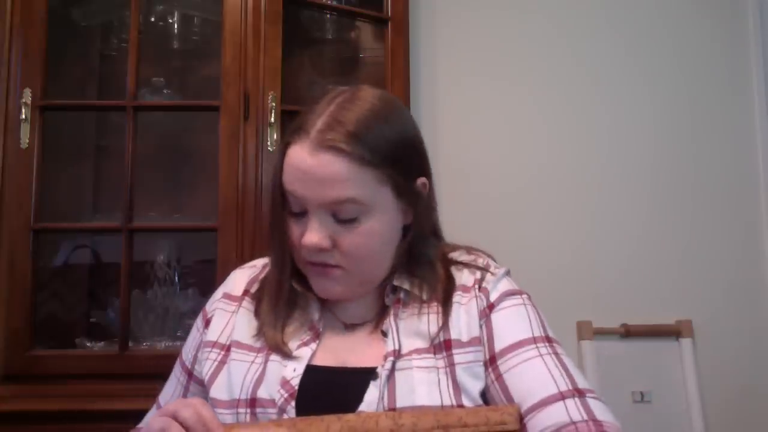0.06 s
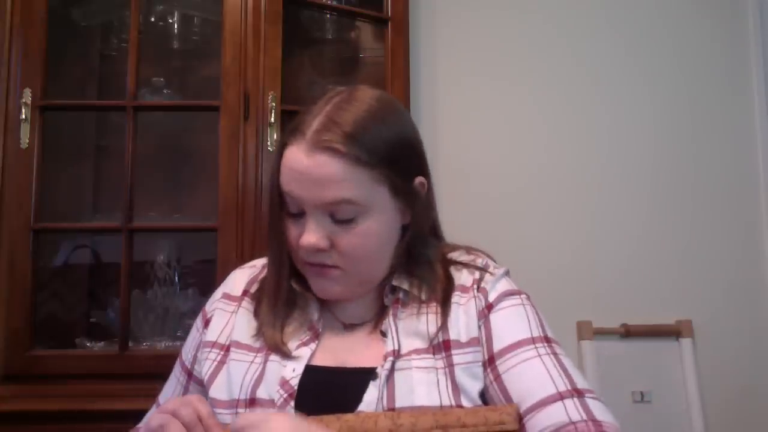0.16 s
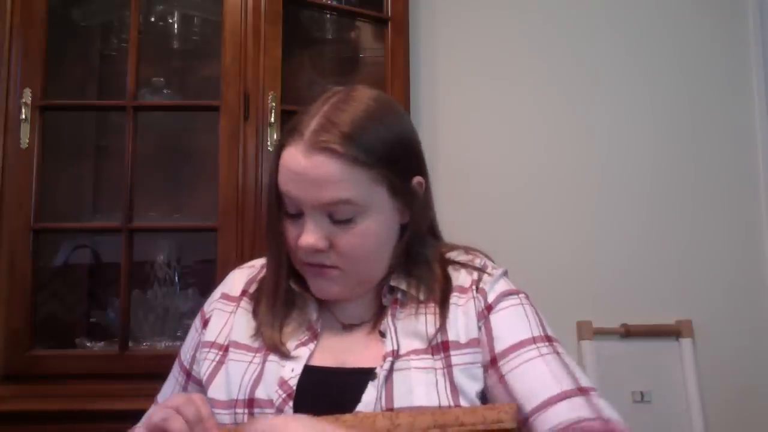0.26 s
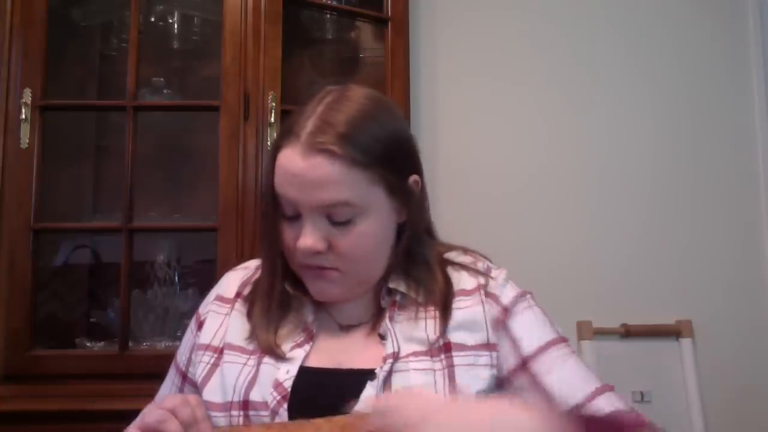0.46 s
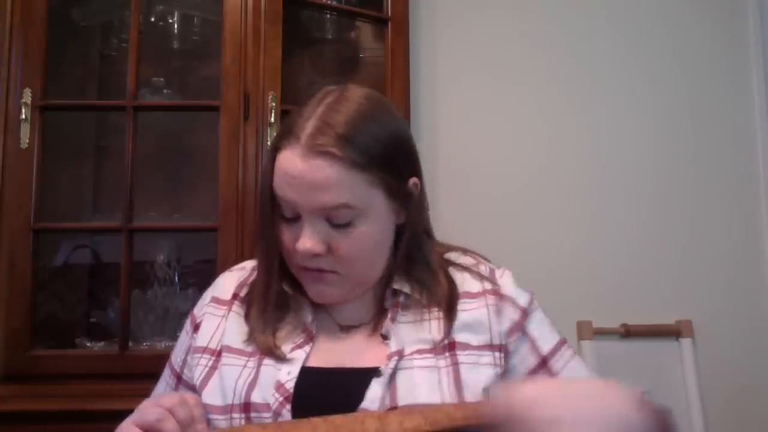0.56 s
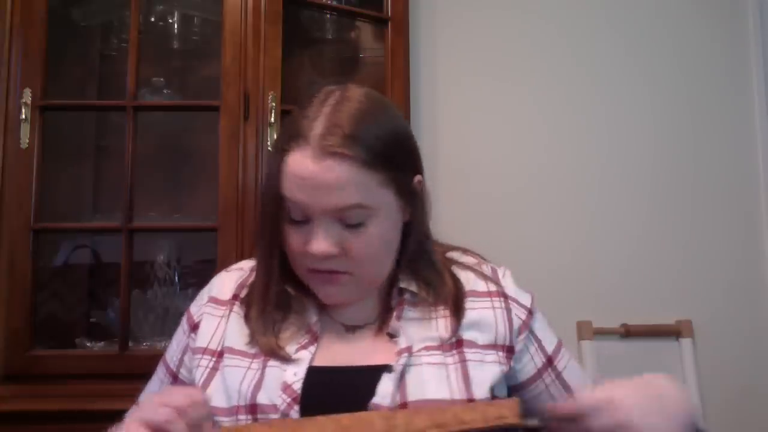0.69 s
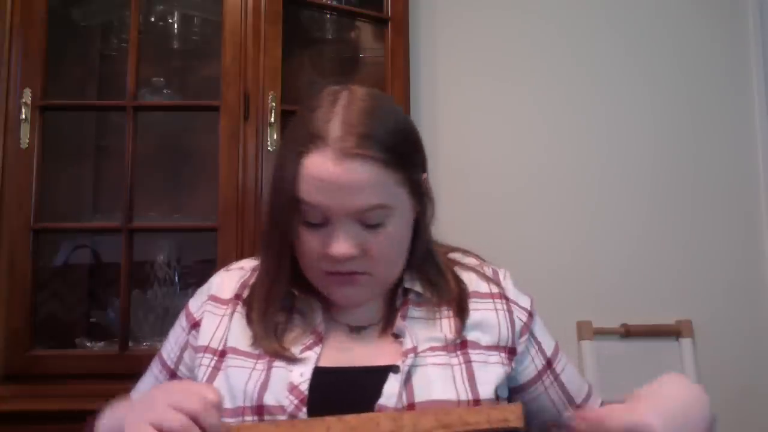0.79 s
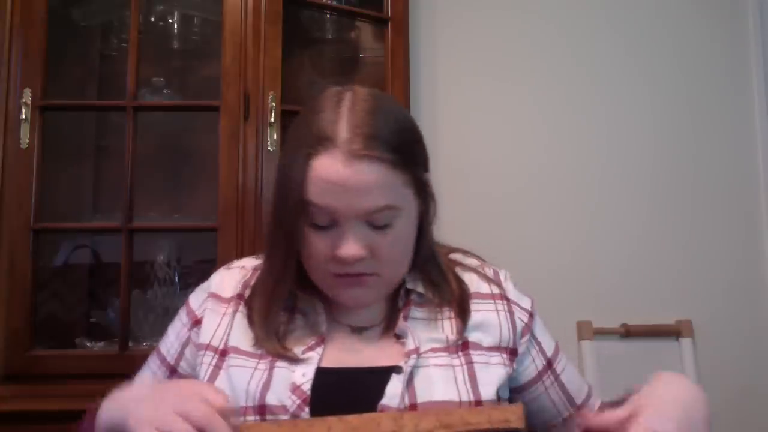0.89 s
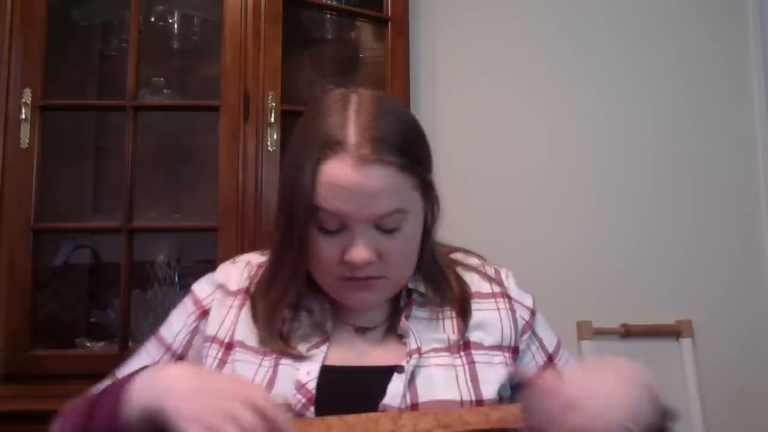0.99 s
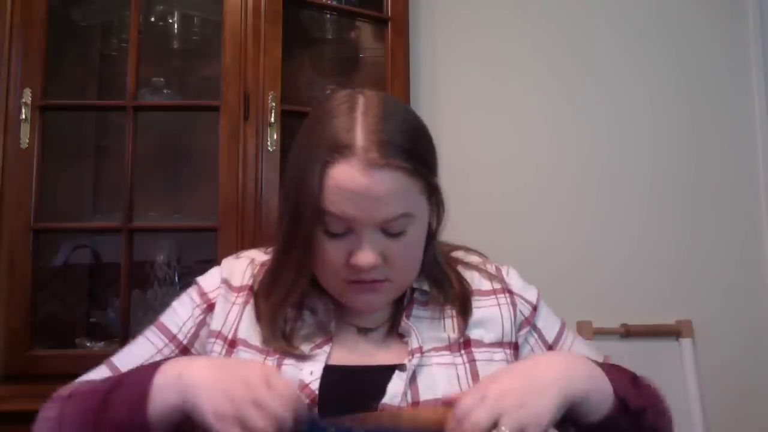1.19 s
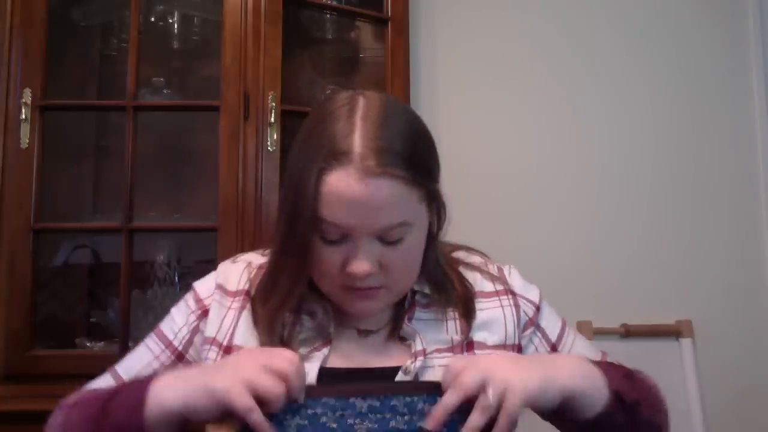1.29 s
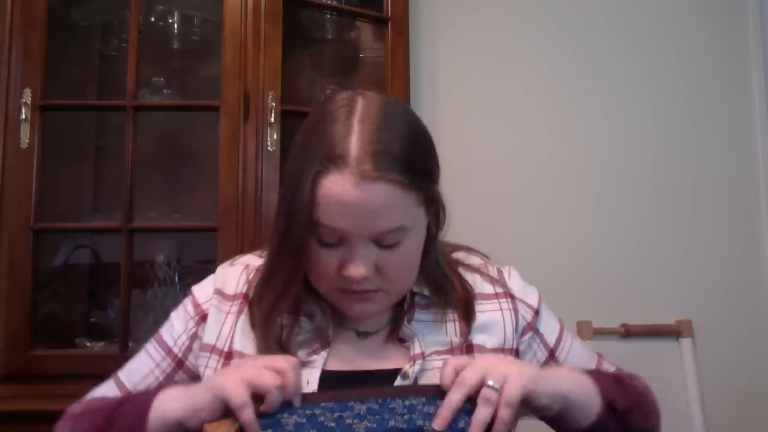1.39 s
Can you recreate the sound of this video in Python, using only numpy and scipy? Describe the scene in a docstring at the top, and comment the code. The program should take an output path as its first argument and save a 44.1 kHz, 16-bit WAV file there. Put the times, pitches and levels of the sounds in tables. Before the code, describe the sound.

A zipper on a fabric bag is pulled open in a quiet small room. The tab ticks lightly just before 0.2 seconds, then the zip runs until about 0.7 seconds, its rasp rising in pitch to around 0.5 seconds and falling again, with thin metal squeaks. Soft thuds, faint cloth rustle and more small ticks follow until about 1.3 seconds, over a faint hum.

```python
"""A small room hums and the cloth of a fabric bag rustles faintly. The pull tab ticks, then the
zipper opens in one short stroke. The slider trips over the teeth at a rate that rises and falls
with the hand's speed; each tooth thumps the tape and scrapes the slider. Metal parts squeak and
the room briefly echoes the zipper's low tone. Soft thuds follow, and the tab ticks again."""
import sys
import numpy as np
from scipy import signal
from scipy.fft import rfft, irfft, next_fast_len
from scipy.io import wavfile
from scipy.ndimage import uniform_filter1d, map_coordinates

SR = 44100
rng = np.random.default_rng(int(sys.argv[2]) if len(sys.argv) > 2 else 0)


def waveform_to_disk(signal):
    """Save audio, clipped to [-1, 1], as 16-bit WAV at the path in sys.argv[1]."""
    frames = np.transpose(np.atleast_2d(signal))
    scaled = np.clip(frames, -1, 1) * 32767
    samples = np.round(scaled).astype(np.int16)
    wavfile.write(sys.argv[1], SR, samples)


N = 63945
TIME_S = np.arange(N) / SR


def amp(db):
    return 10 ** (np.asarray(db) / 20)


def unit_rms(x):
    return x / np.sqrt(np.mean(x ** 2) + 1e-20)


def at_hz(points, hz):
    """Read (hz, value) points on a log axis."""
    knots_hz, values = np.transpose(points)
    return np.interp(np.log(hz + 1), np.log(knots_hz + 1), values)


def curve(points):
    """Read (time_s, value) points at every sample."""
    return np.interp(TIME_S, *np.transpose(points))


def wobble(knots_per_s):
    """Smooth random curve."""
    return map_coordinates(rng.standard_normal(N // 20), [TIME_S * knots_per_s])


def filtered(x, response):
    """Apply a gain given as a function of Hz."""
    size = next_fast_len(N + SR // 2)
    return irfft(rfft(x, size) * response(np.fft.rfftfreq(size, 1 / SR)), size)[:N]


def coloured(x, spectrum, size=4096):
    """Minimum-phase, unit-energy filter shaped by (hz, db) points."""
    cepstrum = irfft(np.log(amp(at_hz(spectrum, np.fft.rfftfreq(size, 1 / SR)))))
    cepstrum[1:size // 2] *= 2
    cepstrum[size // 2 + 1:] = 0
    ring = irfft(np.exp(rfft(cepstrum)))
    return signal.fftconvolve(x, ring / np.linalg.norm(ring))[:N]


def pulses(positions, sizes, half_width=8):
    """Impulses at fractional sample positions."""
    taps = np.floor(positions)[:, None].astype(int) + np.arange(1 - half_width, half_width + 1)
    offset = taps - positions[:, None]
    weights = sizes[:, None] * np.sinc(offset) * np.sinc(offset / half_width)
    return np.bincount(np.clip(taps, 0, N).ravel(), weights.ravel(), N + 1)[:N]


def swells(rows, half_width_hz):
    """Half-sine swells of narrow-band noise."""
    out = np.zeros(N)
    for start_s, db, pitch_hz, length_s in rows:
        band = filtered(rng.standard_normal(N),
                        lambda hz: 1 / (1 + ((hz - pitch_hz) / half_width_hz) ** 4))
        progress = np.clip((TIME_S - start_s) / length_s, 0, 1)
        out += amp(db) * np.sin(np.pi * progress) * unit_rms(band)
    return out


# air noise spectrum: freq_hz, gain_db
AIR_SPECTRUM = [(15, -68), (25, -13), (43, -31), (82, -14.5), (156, -6), (289, -9), (444, -18), (482, -21),
                (1080, -22.5), (1900, -21.5), (2920, -29), (3250, -20.5), (3530, -30), (5420, -31.5),
                (15500, -49.5)]
# mains hum: pitch_hz, level_db
MAINS_HUM = [(59.5, -83.5), (119, -72.5)]


def room_tone(air_db=-64):
    """Steady air noise and faint mains hum."""
    hum = sum(amp(db) * np.sqrt(2) * np.sin(2 * np.pi * (hz * TIME_S + rng.random()))
              for hz, db in MAINS_HUM)
    return hum + amp(air_db) * coloured(rng.standard_normal(N), AIR_SPECTRUM)


# cloth handling: time_s, level_db
RUSTLE_LEVEL = [(0, -66.5), (.14, -78), (.3, -47.5), (.72, -63.5), (.86, -67), (.96, -67.5), (1.04, -70.5),
                (1.10, -67.5), (1.135, -64), (1.17, -69), (1.21, -62.5), (1.28, -66.5), (1.45, -74.5)]
# cloth spectrum: freq_hz, gain_db
CLOTH_SPECTRUM = [(200, -5.5), (700, 3), (1500, 1), (2400, -1.5), (4000, -2.5), (7000, -10), (10000, -24),
                  (15000, -39)]


def cloth(grain_db=3):
    """Grainy rustle of the bag in the hands."""
    flutter = unit_rms(uniform_filter1d(rng.standard_normal(N), size=80))
    grain = unit_rms(amp(grain_db * flutter))
    return amp(curve(RUSTLE_LEVEL)) * coloured(grain * rng.standard_normal(N), CLOTH_SPECTRUM)


# pull tab ticks: start_s, level_db, ring_hz
TAB_TICKS = [(0.1496, -54, 2880), (0.174, -55.5, 3000), (0.2007, -53, 2960), (0.774, -55.5, 5310),
             (.857, -54, 1380), (0.9163, -48.5, 3800), (.919, -55.5, 7560), (.973, -56.5, 3040),
             (0.991, -57, 1240), (1.061, -57, 7340), (1.143, -56.5, 6500)]


def pull_tab(t60_s=0.022, width_oct=0.22, crack_db=-4.5):
    """The loose tab ticks: a broad crack with one brief resonance."""
    out = np.zeros(N)
    hz = np.geomspace(200, 16000, num=60)
    crack = amp(crack_db + at_hz(CLOTH_SPECTRUM, hz))
    for start_s, db, ring_hz in TAB_TICKS:
        decay = (TIME_S >= start_s) * amp(db - 60 * np.abs(TIME_S - start_s) / t60_s)
        resonance = np.exp(-.5 * (np.log2(hz / ring_hz) / width_oct) ** 2)
        spectrum = np.column_stack([hz, 20 * np.log10(resonance + crack)])
        out += coloured(decay * rng.standard_normal(N), spectrum)
    return out


# tape and bag resonances: centre_hz, width_hz, gain_db
BAG_MODES = [(313, 100, -7.5), (620, 230, -21), (1220, 230, 4), (1530, 160, -3.5), (2640, 580, -5),
             (3880, 1170, -4.5), (4990, 620, -11)]


def tooth_thumps(strikes, low_hz=202, top_hz=6500, waver_db=3):
    """Teeth ring tape and bag; the small bag radiates little bass, the soft tape little treble."""
    def response(hz):
        modes = sum((-1) ** k * amp(db) * 1j * hz * width / (centre ** 2 - hz ** 2 + 1j * hz * width)
                    for k, (centre, width, db) in enumerate(BAG_MODES))
        return modes * hz / (hz - 1j * low_hz) / (1 + (hz / top_hz) ** 6)

    waver = amp(waver_db * np.tanh(wobble(knots_per_s=77)))
    return unit_rms(filtered(strikes, response) * waver)


def friction(contact):
    """Noise of even strength, gated by the contact."""
    noise = rng.standard_normal(N)
    return contact * noise / np.sqrt(np.abs(uniform_filter1d(noise ** 2, size=20)))


# slider scraping on teeth: freq_hz, gain_db
SCRAPE_SPECTRUM = [(100, -23), (300, -11.5), (550, -2.5), (800, -11.5), (1200, -4.5), (1600, 4.5),
                   (2250, -1.5), (3000, 3), (4300, 2), (6000, -10), (9000, -20.5), (12000, -66),
                   (15500, -16)]
# hiss of fast impacts: freq_hz, gain_db
SIZZLE_SPECTRUM = [(1500, -22), (4000, -1), (5200, 6), (6600, 3.5), (8000, -3.5), (11000, -15.5),
                   (13000, -12), (15500, -20)]
# upper edge of the rasp: time_s, cutoff_hz
RASP_CUTOFF = [(.25, 7440), (.32, 8600), (.42, 9200), (.5, 11600), (.58, 12100), (.68, 8000)]


def slider_rasp(contact, scrape_gain, sizzle_gain, q=1.6, leak=.05):
    """Scrape and hiss under a resonant low-pass that opens in the fast pull and closes at the stop."""
    scrape = scrape_gain * coloured(friction(contact), SCRAPE_SPECTRUM)
    sizzle = sizzle_gain * coloured(friction(contact), SIZZLE_SPECTRUM)
    hz, frame_s, frames = signal.stft(scrape + sizzle, SR, nperseg=256)
    ratio = hz[:, None] / np.interp(frame_s, *np.transpose(RASP_CUTOFF))
    low_pass = 1 / np.abs(1 - ratio ** 6 + 1j * ratio ** 3 / q)
    return signal.istft(frames * np.hypot(low_pass, leak), SR, nperseg=256)[1][:N]


# tape whine spectrum: freq_hz, gain_db
WHINE_SPECTRUM = [(150, -19), (250, -6.5), (310, 1), (390, -2), (450, -14.5), (560, -6), (630, -10),
                  (700, -4), (850, -29.5), (1020, -3), (1180, 2.5), (1400, -4.5), (1600, -7), (2100, -12.5),
                  (2400, -28), (2640, -8), (2850, -10.5)]


def tape_whine(rate_hz, teeth_passed, speed, slip_rad=0.14, waver_db=5):
    """Four harmonics of the tooth rate; a slow slider slips unevenly and smears them."""
    slip = slip_rad / np.maximum(speed, .5) ** 2 * wobble(knots_per_s=190)
    phase = 2 * np.pi * teeth_passed + slip
    out = np.zeros(N)
    for k in range(1, 5):
        db = at_hz(WHINE_SPECTRUM, k * rate_hz) + waver_db * np.tanh(wobble(knots_per_s=55))
        out += np.sqrt(2) * amp(db) * np.sin(k * phase)
    return out


# table reflection as the slider travels: time_s, delay_s, gain
TABLE_ECHO = [(.22, 0.00066, 0.69), (.35, 0.00065, 0.27), (.48, 0.000774, 0.26), (.63, 0.000762, 0.27),
              (.7, 0.00075, 0.36)]


def table_bounce(x):
    """A slightly later copy off the table combs the sound."""
    time_s, *columns = np.transpose(TABLE_ECHO)
    delay_s, gain = [np.interp(TIME_S, time_s, column) for column in columns]
    echo = map_coordinates(x, [SR * (TIME_S - delay_s)])
    return (x + gain * echo) / np.hypot(1, gain)


# teeth passing the slider: time_s, rate_hz
TOOTH_RATE = [(.19, 139.1), (.22, 225.4), (.254, 326.7), (.305, 407.6), (.342, 520.6), (.378, 588.5),
              (.416, 650.5), (.45, 687.8), (.485, 707.5), (.516, 679), (.55, 603.5), (.57, 553.5),
              (.606, 406), (.645, 305), (.69, 180.5)]
# stroke envelopes: time_s, tape_db, scrape_db, sizzle_db
STROKE_GAINS = [(.19, -66, -77, -98), (.212, -55, -71, -82), (0.229, -48, -57, -64), (.256, -50, -46, -74),
                (.305, -46.5, -47.5, -67), (0.334, -44, -47.5, -49.5), (0.379, -39, -43, -51),
                (0.428, -44.5, -46.5, -43.5), (.48, -45, -40.5, -40.5), (.532, -44, -36, -40),
                (0.568, -37.5, -39.5, -45), (0.609, -52.5, -40.5, -54.5), (0.646, -48.5, -48, -77),
                (.675, -74, -59.5, -63), (.71, -92, -89, -64)]


def zipper(fast_hz=700, jitter_s=36e-6, row_mismatch=0.037, thump_scatter_db=2,
           scrape_scatter_db=3.5, scrape_life_teeth=0.75, drag=0.44):
    """One thump and one short scrape per tooth, over the slider's steady drag and the tape's whine."""
    rate_hz = curve(TOOTH_RATE)
    speed = rate_hz / fast_hz
    teeth_passed = np.cumsum(rate_hz) / SR
    tooth = np.arange(int(teeth_passed[-1]) + 1)
    timing, force, roughness = np.sqrt(3) * rng.uniform(-1, 1, (N // 20, 3))[tooth].T

    positions = np.interp(tooth, teeth_passed, np.arange(N))
    strike_speed = np.interp(positions, np.arange(N), speed)
    positions += jitter_s * SR * timing / strike_speed ** 2
    sizes = (1 + row_mismatch * (-1) ** tooth) / np.sqrt(strike_speed)  # two rows, struck unequally
    strikes = pulses(positions, sizes * amp(thump_scatter_db * force))
    grip = amp(scrape_scatter_db * roughness[teeth_passed.astype(int)])
    contact = unit_rms(drag + grip * np.exp(-(teeth_passed % 1) / scrape_life_teeth))

    time_s, *gains_db = np.transpose(STROKE_GAINS)
    tape, scrape, sizzle = [amp(np.interp(TIME_S, time_s, db, -np.inf, -np.inf)) for db in gains_db]
    thumps = amp(-3.5) * tape * tooth_thumps(strikes)
    rasp = slider_rasp(contact, amp(-2.5) * scrape, amp(-2.4) * sizzle)
    whine = amp(-2) * tape * tape_whine(rate_hz, teeth_passed, speed)
    return whine + table_bounce(thumps + rasp)


# metal squeaks: start_s, level_db, pitch_hz, length_s
METAL_SQUEAKS = [(.215, -69, 7870, 0.069), (.296, -47, 3130, 0.024), (.33, -54, 5900, 0.065),
                 (.355, -48.5, 3040, 0.035), (.63, -60.5, 5320, 0.048), (.78, -73, 6870, 0.062),
                 (.843, -72, 11740, 0.022), (.915, -68, 3140, 0.052), (1.137, -62.5, 6850, 0.014)]


def metal_squeaks():
    """The metal parts ring and squeak thinly."""
    return swells(METAL_SQUEAKS, half_width_hz=150)


# low swells: start_s, level_db, pitch_hz, length_s
LOW_SWELLS = [(.315, -52, 317.5, 0.041), (.66, -58, 174, 0.023), (.775, -59.5, 169, 0.066),
              (.875, -61, 192, 0.06), (.97, -59.5, 294, 0.036)]


def low_swells():
    """Low swells: a short room echo of the zipper's low tone, then soft thuds."""
    return swells(LOW_SWELLS, half_width_hz=41.5)


# room decay: freq_hz, t60_s
ROOM_DECAY = [(150, .33), (1000, 0.26), (6000, 0.17), (11000, 0.11)]


def room(x, tail_db=-11, walls_db=-12, bounces=10):
    """Direct sound, early wall bounces and a short tail."""
    hz, frame_s, frames = signal.stft(rng.standard_normal(SR // 2), SR, nperseg=256)
    decay = amp(-60 * frame_s / at_hz(ROOM_DECAY, hz)[:, None])
    tail = signal.istft(frames * decay, SR, nperseg=256)[1]
    delays_s = rng.uniform(.002, 0.027, bounces)
    walls = pulses(SR * delays_s, rng.standard_normal(bounces))[:len(tail)]
    response = amp(tail_db) * tail / np.linalg.norm(tail) + amp(walls_db) * walls / np.linalg.norm(walls)
    return x + signal.fftconvolve(x, response)[:N]


def scene():
    """Bag handling and zipper in the humming room, mono."""
    small_sounds = pull_tab() + cloth() + metal_squeaks() + low_swells()
    return (room_tone() + room(small_sounds + zipper()))[None]


def record(dry):
    """Roll off the deep bass and cut the top treble."""
    low_hz, top_hz = 55.4, 15700
    return filtered(dry[0], lambda hz: (hz < top_hz) * hz ** 4 / np.hypot(hz ** 4, low_hz ** 4))[None]


dry = scene()
out = record(dry)
waveform_to_disk(out)
```